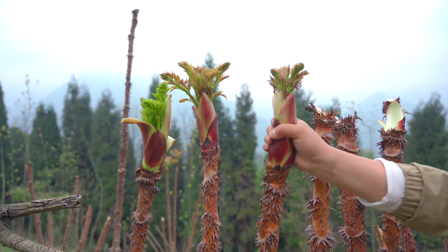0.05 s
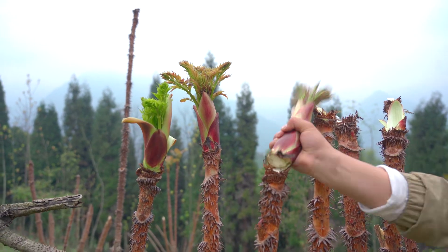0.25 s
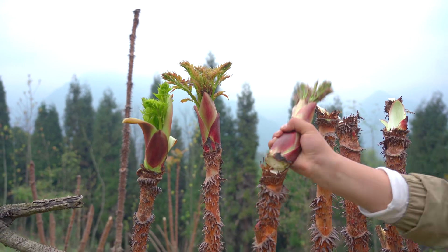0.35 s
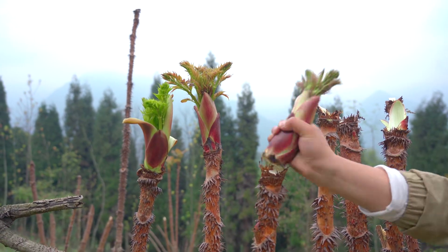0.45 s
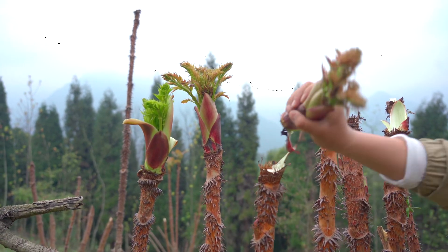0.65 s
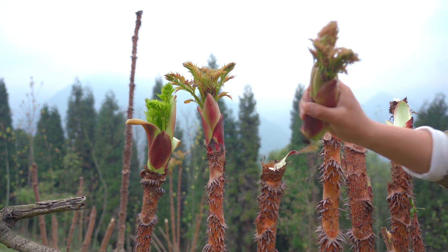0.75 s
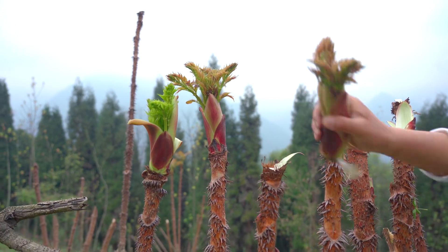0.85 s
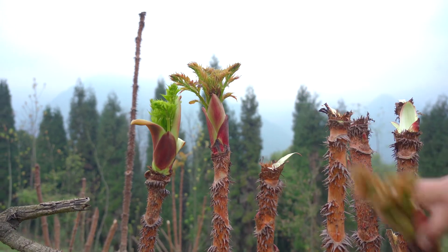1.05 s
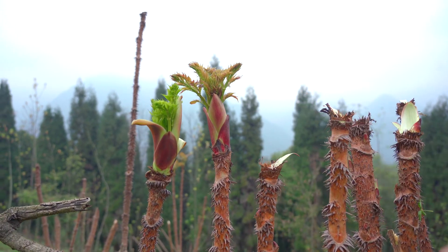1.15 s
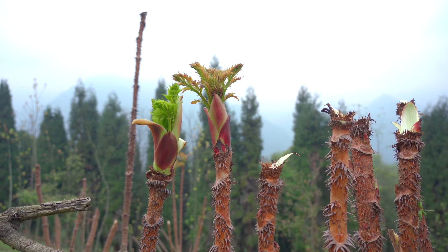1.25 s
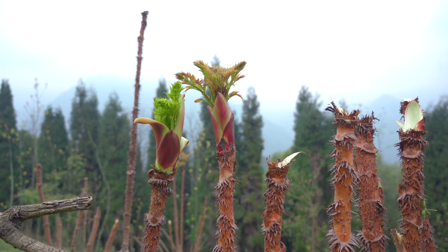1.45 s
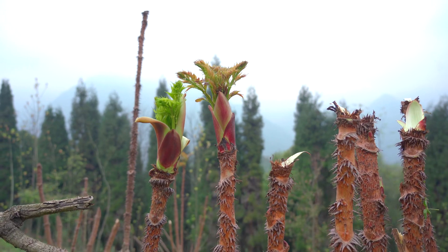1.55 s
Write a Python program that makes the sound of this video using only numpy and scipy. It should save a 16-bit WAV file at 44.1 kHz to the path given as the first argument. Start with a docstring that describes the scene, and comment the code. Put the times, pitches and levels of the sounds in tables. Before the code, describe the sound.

A crisp crack as a plant shoot is broken off by hand, then faint rustling.

```python
"""A thick, juicy shoot, bent by hand, breaks off its woody stem, close by and outdoors.
The core parts with a hollow pop and a volley of bursting fibres; the stem springs back.
The last strip of skin peels with a crackle and a faint squeak. Sleeve and leaves rustle, bud scales
tick and the hollow stalk knocks as the shoot is carried off, over hillside air and a faint far whine."""
import sys
import numpy as np
from scipy import signal
from scipy.fft import rfft, irfft, next_fast_len
from scipy.io import wavfile

SR = 44100
rng = np.random.default_rng(int(sys.argv[2]) if len(sys.argv) > 2 else 0)


def put_to_file(sound):
    """Save the sound as 16-bit audio at rate SR, in the file named by the first command-line argument."""
    columns = np.atleast_2d(sound).T  # one column per channel
    safe = np.clip(columns, -1, 1)
    whole_steps = np.round(safe * 32767)
    wavfile.write(sys.argv[1], SR, whole_steps.astype(np.int16))


N = 70560

# Source spectra. Each row: frequency in Hz, gain in dB.
AIR_SPECTRUM = [(25, -2.5), (90, 0.5), (200, -6.5), (430, -5.5), (820, -6.5), (1150, -15), (1700, -15.5),
                (2300, -12.5), (6000, -20), (15500, -26.5)]
LEAF_SPECTRUM = [(300, -6), (800, 4), (1500, 0.5), (5500, -3.5), (9000, -8), (15000, -12.5)]
CRACK_BODY = [(60, -48), (200, -25), (420, -31), (700, -4), (920, -1), (1250, -8), (1700, -14), (3000, -40)]
CRACK_MIDDLE = [(700, -29), (1400, -17.5), (2000, 0.5), (2500, -6.5), (3700, 4.5), (4600, -6),
                (7000, -30.5)]
CRACK_TREBLE = [(2500, -45), (4400, 1), (5700, -5), (6600, 10.5), (8000, -2.5), (10500, -1), (12500, -16),
                (15000, -1.5), (16500, -24)]
SKIN_SPECTRUM = [(60, -22.5), (500, -16), (900, -12), (1500, -8), (3500, -1.5), (5300, -5.5), (7500, -4),
                 (16000, -15.5)]
SLEEVE_SPECTRUM = [(100, -10), (400, -4.5), (800, 2.5), (1500, -9), (3000, -5), (5000, -16), (15000, -26)]
# Handling impacts. Each row: start in seconds, level in dB, pitch in Hz.
SCALE_TICKS = [(0.0125, -51, 2270), (0.136, -52.5, 3300), (0.198, -58, 7200), (0.211, -52, 2150),
               (0.4795, -54, 4800), (.696, -59.5, 5900), (0.755, -50, 5950), (.767, -54.5, 2200),
               (0.86, -58.5, 2300), (1.054, -55.5, 6150), (1.0911, -53, 5970), (1.178, -43, 5080),
               (1.2226, -50, 4860), (1.2893, -53.5, 4200), (1.3619, -56.5, 3670), (1.419, -60.5, 5400)]
STALK_KNOCKS = [(.0125, -48.5, 805), (0.138, -47, 817), (.211, -55.5, 820), (.4797, -46.5, 748),
                (.665, -53, 863), (0.766, -48, 844), (1.178, -50, 793), (1.507, -53.5, 802)]
# Modes of the breaking core. Each row: frequency in Hz, level in dB, T60 in seconds.
CORE_MODES = [(278, -33.5, 0.029), (850, -26.5, 0.042), (956.5, -29, 0.07), (1301.6, -25.5, 0.048),
              (6380, -18.5, 0.029)]
# Bursting fibres. Each row: start in seconds, then body, middle and treble levels in dB.
FIBRE_BURSTS = [(0.2475, -39, -23, -40), (0.2495, -37, -25, -30), (0.2512, -38, -27, -27),
                (.2533, -34.5, -33.5, -28.5), (.2549, -28.5, -33, -39), (.2572, -37, -63, -48),
                (.2605, -44, -42, -44), (0.2651, -44, -30, -54), (0.269, -55, -41, -53),
                (.2823, -56, -43, -37.5), (.2860, -49.5, -42.5, -50), (.3027, -40.5, -40.5, -59),
                (.3120, -51, -47.5, -58), (.3216, -76, -46, -43.5), (.3293, -62, -57, -47),
                (.3516, -79, -50.5, -46.5), (.4180, -62, -54, -51), (0.4245, -59, -51, -61),
                (0.4326, -59, -49, -56), (.4392, -50, -46, -53), (0.442, -63, -49, -60),
                (.4796, -42.5, -33.5, -39), (0.495, -55, -51, -63), (.5418, -61, -58, -52.5),
                (.5675, -63, -48.5, -63)]
# Stalk resonances. Each row: frequency in Hz, width in Hz, gain in dB.
STALK_MODES = [(2800, 37, -4), (3496, 62, -5.5), (3750, 50, -14.5), (7900, 160, 1.5)]
# Tearing skin. Each row: start in seconds, length in seconds, level in dB, fall in dB per second.
SKIN_TEARS = [(0.251, 0.16, -34.5, 240), (0.41, 0.037, -54.5, 19), (.481, .02, -50, 220),
              (0.532, 0.024, -54.5, 152)]
# Level swells. Each row: centre in seconds, width in seconds, level in dB.
SLEEVE_SWISHES = [(.64, 0.12, -58.5)]
LEAF_BRUSHES = [(.73, 0.067, -68.5), (.89, 0.11, -66.5), (1.11, 0.036, -60.5), (1.21, 0.051, -61),
                (1.36, 0.092, -64.5), (1.51, 0.017, -61.5)]
RECOIL, RECOIL_HZ = [(.263, 0.015, -57)], 139.1
SQUEAKS, SQUEAK_HZ, SQUEAK_WIDTH_HZ = [(.492, 0.0073, -50.5), (.545, 0.037, -56.5)], 3500, 290
# Stereo spread of noise. Each row: frequency in Hz, left-right correlation.
NOISE_CORRELATION = [(100, 1), (550, 0.86), (1650, 0.53), (6000, 0.036)]
# Side signal of the near sounds. Each row: frequency in Hz, gain in dB.
SIDE_SPECTRUM = [(200, -22), (1000, -16), (3000, -14.5), (7000, -7), (14000, -2.5)]
# Channel tilt of the near sounds. Each row: frequency in Hz, left minus right gain in dB.
BALANCE = [(290, 0), (650, -2.9), (1400, -2.5), (3100, -.6), (15000, -1.5)]

RING_ATTACK_S = 0.0015


def amp(db):
    """Decibels to gain."""
    return 10 ** (np.asarray(db) / 20)


def unit(x):
    """Scale to rms 1."""
    return x / np.sqrt(np.mean(x ** 2) + 1e-20)


def impact(x, db=0):
    """Scale to the energy of 3 ms at an rms level of db."""
    return amp(db) * x * np.sqrt(.003 * SR) / np.linalg.norm(x)


def along(points, hz):
    """Interpolate (Hz, value) points on a log axis."""
    freqs, values = np.transpose(points)
    return np.interp(np.log(hz + 1), np.log(freqs + 1), values)


def filtered(x, response):
    """Apply a complex frequency response."""
    n = x.shape[-1]
    size = 2 * next_fast_len(n // 2 + 4096)
    return irfft(rfft(x, size) * response(np.fft.rfftfreq(size, 1 / SR)), size)[..., :n]


def coloured(x, points):
    """Minimum-phase filter through (Hz, dB) points."""
    def response(hz):
        cepstrum = irfft(np.log(amp(along(points, hz))))
        cepstrum[1:len(cepstrum) // 2] *= 2
        cepstrum[len(cepstrum) // 2 + 1:] = 0
        return np.exp(rfft(cepstrum))
    return filtered(x, response)


def resonance(f, hz, width_hz):
    """Two-pole band-pass response."""
    return 1j * f * width_hz / (hz * hz - f * f + 1j * f * width_hz)


def add(track, start_s, sound):
    """Mix a sound in."""
    part = track[round(start_s * SR):][:len(sound)]
    part += sound[:len(part)]


def rush(spectrum):
    """Stereo noise of rms 1, nearly mono in the bass."""
    def response(hz):
        angle = np.arccos(np.clip(along(NOISE_CORRELATION, hz), -1, 1)) / 2
        return spectrum(hz) * [np.cos(angle), np.sin(angle)]
    mid, side = filtered(rng.standard_normal((2, N)), response)
    return unit(np.array([mid + side, mid - side]))


def crackle(spectrum, per_s, spread_db):
    """Dense tiny clicks of uneven size, rms 1."""
    hits = (rng.random(N) < per_s / SR) * rng.choice([-1, 1], N)
    sizes = amp(spread_db * np.clip(rng.standard_normal(N), -2, 2))
    return unit(coloured(hits * sizes, spectrum))


def burst(t60_s, spectrum, attack_s=.0001):
    """Short noise crack of constant energy."""
    t = np.arange(SR // 20) / SR
    envelope = (1 - np.exp(-t / attack_s)) * amp(-60 * t / t60_s)
    return impact(coloured(envelope * rng.standard_normal(len(t)), spectrum))


def swells(rows):
    """Sum of Gaussian level swells."""
    t = np.arange(N) / SR
    return sum(amp(db) * np.exp(-((t - centre_s) / width_s) ** 2) for centre_s, width_s, db in rows)


def scatter(x, t60_s):
    """Short spray of reflections, unit energy gain."""
    t = np.arange(SR // 4) / SR
    tail = rng.standard_normal(len(t)) * amp(-60 * t / t60_s)
    return signal.fftconvolve(x, tail / np.linalg.norm(tail))[:N]


def hillside_air(db=-62):
    """Steady, quiet outdoor air."""
    return amp(db) * rush(lambda hz: amp(along(AIR_SPECTRUM, hz)))


def far_whine(hz=1363, width_hz=157, db=-63, fade_db_per_s=9):
    """A narrow noise band, fading."""
    level = amp(db - fade_db_per_s * np.arange(N) / SR)
    return level * rush(lambda f: resonance(f, hz, width_hz) ** 2)


def handling(tick_q=2.2, broadband_db=-10, knock_t60_s=0.019, tail_db=-5):
    """In the hand, bud scales tick at their own pitch and the hollow stalk knocks."""
    hits, t = np.zeros(N), np.arange(SR // 20) / SR
    for start_s, db, hz in SCALE_TICKS:
        click = burst(t60_s=.011, spectrum=LEAF_SPECTRUM)
        tick = filtered(click, lambda f: amp(broadband_db) + resonance(f, hz, hz / tick_q) ** 2)
        add(hits, start_s, impact(tick, db))
    envelope = amp(-60 * t / knock_t60_s) * (1 - np.exp(-t / RING_ATTACK_S))
    for start_s, db, hz in STALK_KNOCKS:
        add(hits, start_s, impact(envelope * np.sin(2 * np.pi * hz * t), db))
    return hits + amp(tail_db) * scatter(hits, t60_s=.05)


def core_pop(start_s=.2474, hz=845, db=-12.8, rise_s=.0013, low_cut_hz=590):
    """The core lets go in a hollow pop of a few cycles and rings briefly."""
    out, t = np.zeros(N), np.arange(SR // 5) / SR
    envelope = (t / rise_s * np.exp(1 - t / rise_s)) ** 2
    pulse = amp(db) * envelope * np.sin(2 * np.pi * hz * t)
    low_cut = signal.butter(4, low_cut_hz, "highpass", fs=SR, output="sos")
    ring = sum(amp(mode_db - 60 * t / t60_s) * np.sin(2 * np.pi * mode_hz * t)
               for mode_hz, mode_db, t60_s in CORE_MODES)
    add(out, start_s, signal.sosfilt(low_cut, pulse) + ring * (1 - np.exp(-t / RING_ATTACK_S)))
    return out


def fibre_cracks(thick_db=-26, thick_t60_s=0.0072, db_per_halving=26):
    """Fibres burst in three bands; thinner, quieter ones crack shorter."""
    out, bands = np.zeros(N), (CRACK_BODY, CRACK_MIDDLE, CRACK_TREBLE)
    for start_s, *levels_db in FIBRE_BURSTS:
        t60_s = thick_t60_s * 2 ** ((max(levels_db) - thick_db) / db_per_halving)
        add(out, start_s, sum(amp(db) * burst(t60_s, band) for db, band in zip(levels_db, bands)))
    return out


def through_stalk(x):
    """The stalk's resonances add to the direct sound."""
    return filtered(x, lambda f: 1 + sum(amp(db) * resonance(f, hz, width_hz)
                                         for hz, width_hz, db in STALK_MODES))


def skin_tearing(release_s=.022):
    """The skin peels in short stretches of fading crackle."""
    level, t = np.zeros(N), np.arange(N) / SR
    for start_s, length_s, db, fall_db_per_s in SKIN_TEARS:
        age_s = t - start_s
        fade = amp(db - fall_db_per_s * np.clip(age_s, 0, length_s))
        release = np.exp(-np.maximum(age_s - length_s, 0) / release_s)
        level += (age_s >= 0) * fade * release
    return level * crackle(SKIN_SPECTRUM, per_s=2600, spread_db=5.5)


def stem_recoil():
    """The woody stem springs back with a soft thud."""
    return swells(RECOIL) * np.sin(2 * np.pi * RECOIL_HZ * np.arange(N) / SR)


def strip_squeak():
    """The last strip squeaks as it peels: narrow-band noise."""
    band = filtered(rng.standard_normal(N), lambda f: resonance(f, SQUEAK_HZ, SQUEAK_WIDTH_HZ) ** 2)
    return swells(SQUEAKS) * unit(band)


def sleeve_swish():
    """The arm moves; its sleeve swishes."""
    return swells(SLEEVE_SWISHES) * rush(lambda hz: amp(along(SLEEVE_SPECTRUM, hz)))


def leaf_rustle():
    """Leaves brush past in swells of fine crackle."""
    return swells(LEAF_BRUSHES) * crackle(LEAF_SPECTRUM, per_s=2500, spread_db=3)


def shoot_noises():
    """Handling, crunch, squeak and rustle; fresh noise on each call."""
    return handling() + through_stalk(fibre_cracks() + skin_tearing()) + strip_squeak() + leaf_rustle()


def scene(echo_db=-11):
    """The near break, wider in the treble, with weak echoes off stems and ground, over the air."""
    near = core_pop() + stem_recoil() + shoot_noises()
    mid = near + amp(echo_db) * scatter(near, t60_s=0.037)
    side = coloured(shoot_noises(), SIDE_SPECTRUM)
    pair = np.array([mid + side, mid - side])
    pair = filtered(pair, lambda hz: amp(along(BALANCE, hz) * np.array([[.5], [-.5]])))
    return pair + hillside_air() + far_whine() + sleeve_swish()


def record(dry, top_hz=16000):
    """Steep low-pass."""
    return filtered(dry, lambda hz: 1 / np.sqrt(1 + (hz / top_hz) ** 200))


dry = scene()
out = record(dry)
put_to_file(out)
```